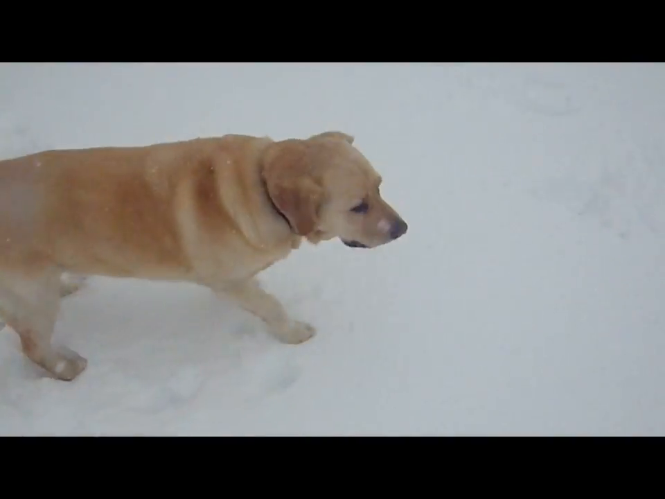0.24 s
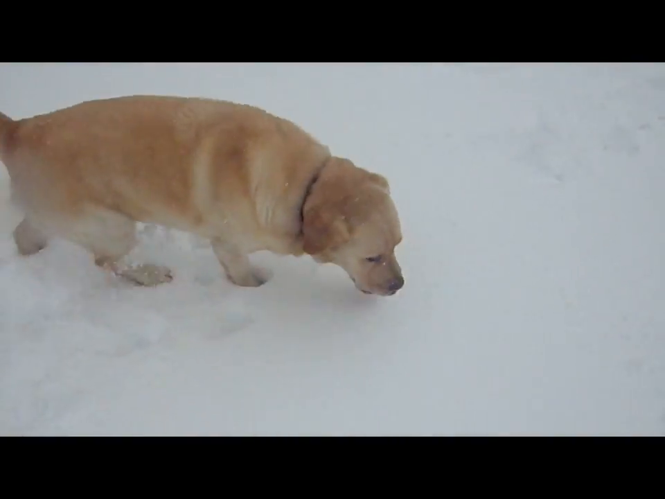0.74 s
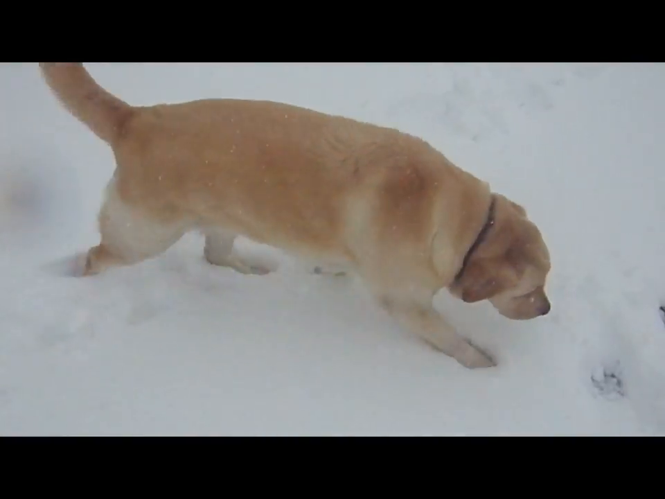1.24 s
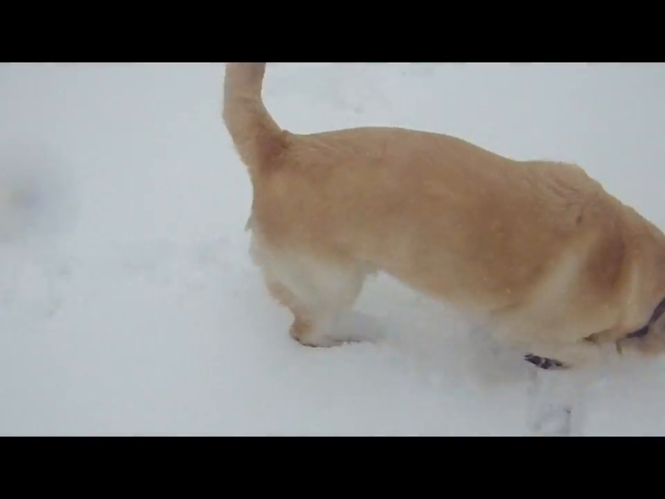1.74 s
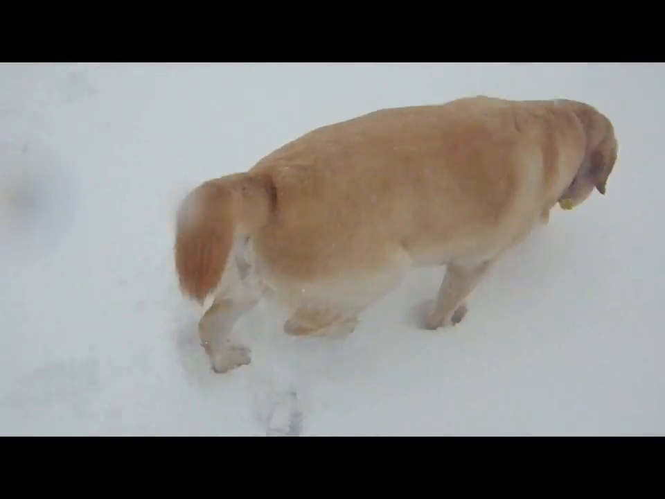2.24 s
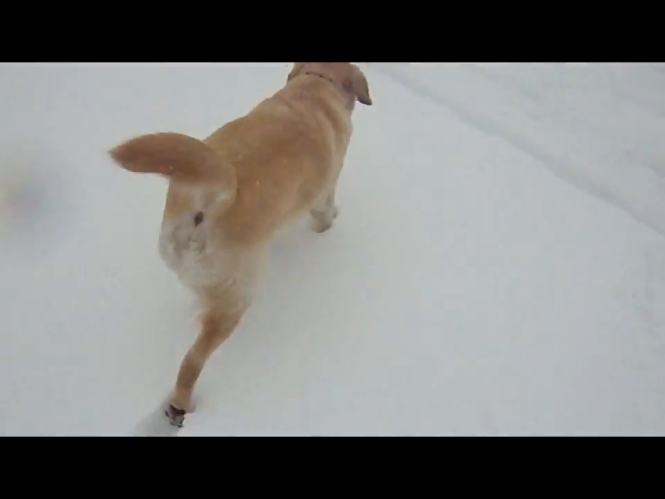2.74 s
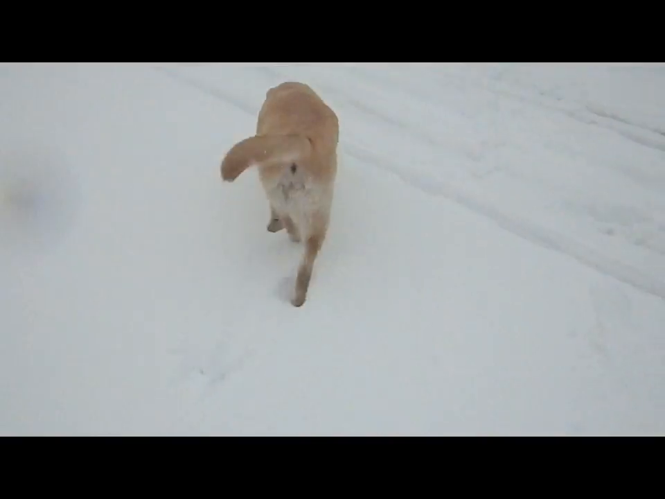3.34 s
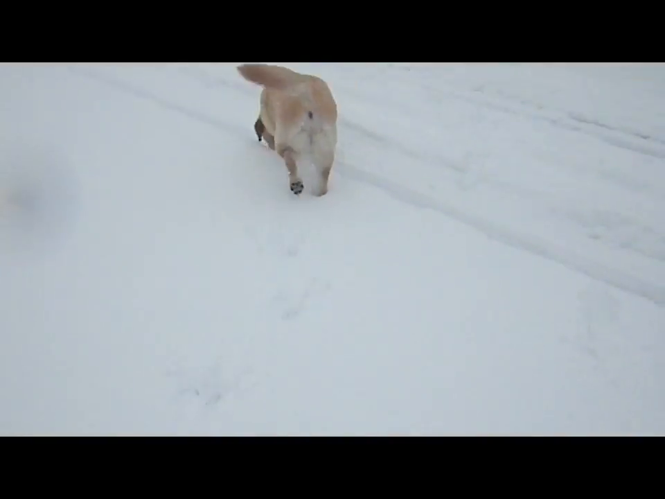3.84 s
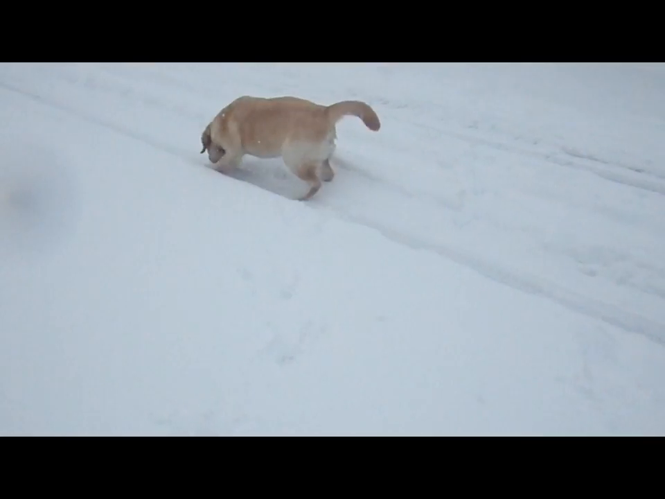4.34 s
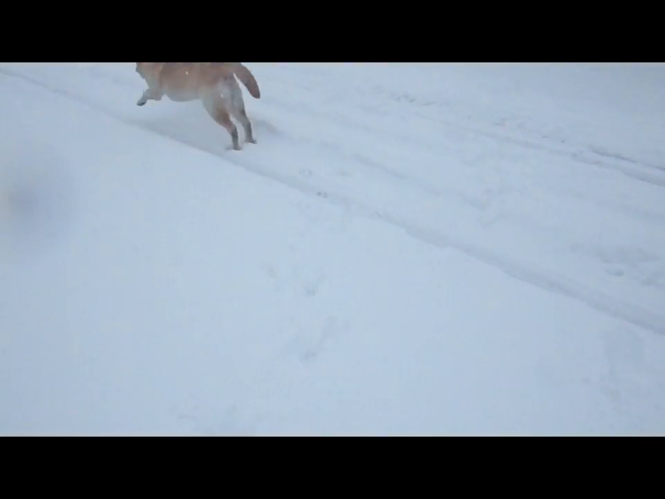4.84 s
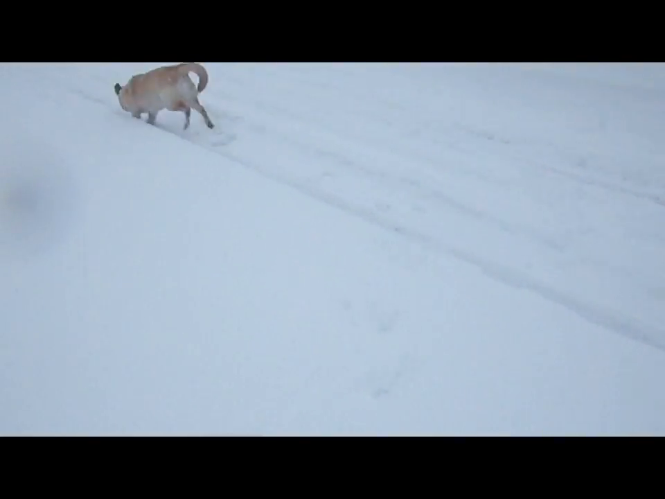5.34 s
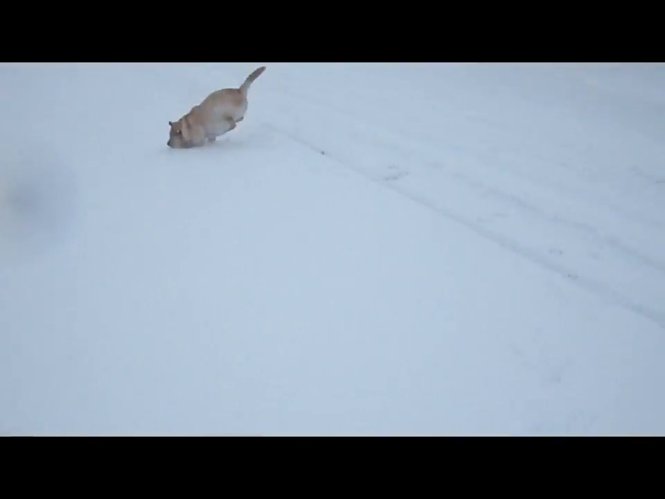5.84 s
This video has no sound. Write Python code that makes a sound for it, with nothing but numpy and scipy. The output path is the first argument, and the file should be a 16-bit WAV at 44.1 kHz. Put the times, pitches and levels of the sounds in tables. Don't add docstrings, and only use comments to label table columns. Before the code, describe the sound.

Outdoors, very close and dry, feet press into fresh snow beside a small hand-held microphone. From 0.2 s brittle cracks and a grainy crunch begin, while wind rushes in lumpy gusts, strongest near 0.5 and 1.1 s. Low bumps and fluttering thumps buffet the microphone from 0.7 to 1.5 s, loudest around 1.4, with a low scuff at 1.25. The crunch continues to 1.7 s; another press follows at 1.9, with softer air bumps until 2.4. Then wind drops to faint rumble and the snow is clear: a short bright crush at 2.8, a longer one from 3.2 to 3.5, and very loud sharp snaps near 3.7 and 4.0. Irregular crunches and cracks follow from 4.2 through 5.5, with a light scuff at 4.4 and a small bump at 5.05. Sparser crackling at 5.8 leads to a last crunch, low drag and soft wind bump just after 6 s.

```python
import sys
import numpy as np
from scipy import signal
from scipy.fft import rfft, irfft, next_fast_len
from scipy.io import wavfile
from scipy.ndimage import uniform_filter1d, map_coordinates

SR = 44100
rng = np.random.default_rng(int(sys.argv[2]) if len(sys.argv) > 2 else 0)


def generate_wav(signal):
    frames = np.transpose(np.atleast_2d(signal))
    scaled = np.clip(frames, -1, 1) * 32767
    pcm = np.round(scaled).astype(np.int16)
    wavfile.write(sys.argv[1], SR, pcm)


def boost(x):
    u = np.asarray(x, float) / 20
    return 10 ** u


N = 269010
SLOW_CLOCK = np.arange(0, N / SR + .004, .002)


def unit(x):
    return x / np.sqrt(np.mean(x ** 2) + 1e-20)


def wobble(rate):
    points = rng.standard_normal(int(N / 40) + 4)
    return map_coordinates(points, [np.arange(N) * rate / SR])


def filtered(x, response):
    size = next_fast_len(N + 8192)
    gain = response(np.fft.rfftfreq(size, 1 / SR))
    return irfft(rfft(x, size) * gain, size)[..., :N]


def coloured(x, points):
    f, db = np.transpose(points)
    return unit(filtered(x, lambda hz: boost(np.interp(np.log(hz + 1), np.log(f), db))))


def grains(chance, spread_db, life_s, cap_db=8):
    draw = rng.random((2, N))
    size_db = np.minimum(-spread_db * np.log(1 - draw[1]), cap_db)
    starts = (draw[0] < chance) * boost(size_db)
    return unit(signal.lfilter([1], [1, -np.exp(-1 / (life_s * SR))], starts))


def ring(t, hz, t60, attack_s):
    return np.sin(2 * np.pi * hz * t) * boost(-60 * t / t60) * (1 - np.exp(-t / attack_s))


def swells(shapes, floor_db):
    power = 0
    for level_db, over_db in shapes:
        power = power + boost(level_db) ** 2 * np.array([[1], [boost(over_db) ** 2]])
    time = np.arange(N) / SR
    return [np.interp(time, SLOW_CLOCK, np.sqrt(p + boost(db) ** 2)) for p, db in zip(power, floor_db)]


def air():
    # peak in seconds, rush level in dB, seconds to fall 10 dB, rumble in dB over the rush.
    gusts = [(.02, -36, .04, -2), (.12, -36, 0.07, -2), (.34, -26, 0.0947, -18), (.45, -22, .1, -22),
             (.54, -14, .07, -26), (.615, -17.5, .04, -24), (.705, -28, 0.05, -4), (.815, -25, .03, -5),
             (.89, -22, .06, -22), (.97, -20, .08, -22), (1.085, -13, .05, -30), (1.15, -17, .05, -20),
             (1.21, -21, .05, -10), (1.345, -33, .04, -1), (1.42, -27, .07, -2), (1.59, -35, 0.1426, -2),
             (1.92, -36, 0.1698, -4), (2.08, -35, 0.0829, -10.5), (2.24, -35, 0.0869, -2),
             (2.4, -37.5, 0.1513, -7.5), (2.5, -36.5, 0.06, -10), (2.78, -41, .07, -5),
             (3.1, -50, 0.0083, -1), (3.39, -37, .17, 1.5), (3.5, -41, .1, -6), (3.85, -40.5, 0.1913, 6.5),
             (4.15, -56.5, 0.0743, 7), (4.47, -36, 0.001, -18), (4.73, -48, .06, 4),
             (5.07, -49, 0.2503, 4.5), (5.25, -48.5, 0.1349, 2), (5.55, -45.5, 0.2697, 4),
             (5.99, -43, .04, -4), (6.055, -39, .035, -0.0167), (6.09, -44, .04, 9)]
    # frequency in Hz, level in dB per Hz.
    rush_tone = [(35, -47.5), (60, -12.5), (130, -5), (226, -.3), (304, -2), (764, -10.5), (826, -12),
                 (1010, -18), (1830, -31), (2500, -41.5), (3250, -67.5), (5500, -120)]
    # frequency in Hz, level in dB per Hz.
    rumble_tone = [(8.8, -35), (15, 3.5), (64, 5.5), (225, -6), (285, -54), (300, -25.5), (390, -42.5),
                   (660, -120)]
    rise_over_fall = 1.0556
    shapes = []
    for s, db, fall_s, over_db in gusts:
        away = np.maximum((s - SLOW_CLOCK) / rise_over_fall, SLOW_CLOCK - s)
        shapes.append((db - 10 * away / fall_s, over_db))
    high, low = swells(shapes, floor_db=(-56, -51))

    eddies = wobble(25)
    lumps = boost(.9 * eddies + 1.8 * wobble(110))
    spits = 2.0126 + 0.45 * grains(120 / SR, spread_db=6, life_s=0.002217)
    rush = coloured(lumps * spits * rng.standard_normal(N), rush_tone)
    rumble = coloured(boost(2.805 * eddies) * rng.standard_normal(N), rumble_tone)
    return boost(1.2) * high * rush + boost(1.56) * low * rumble


def bumps():
    # peak in seconds, level in dB, pitch in Hz, grit in dB under the peak.
    bump_rows = [(0.1212, -21, 237, -26.5), (0.7034, -10.5, 328.6, -15.5), (0.7793, -11, 318.8, -10),
                 (0.8103, -8.5, 290.9, -6), (0.8143, -6.5, 496, -16), (1.082, -15.5, 424, -9.5),
                 (1.1066, -4.5, 390.5, -22), (1.3252, -12, 487.7, -12), (1.3607, -10.5, 338, -8.5),
                 (1.401, -10.5, 211.3, -21.5), (1.4083, -1, 307.1, -23.5), (1.5448, -23.5, 163.8, -11.5),
                 (1.598, -22, 200, -14), (1.7009, -26, 94.24, -17), (1.9195, -16, 180.2, -12.5),
                 (1.9982, -18, 197.5, -19), (2.069, -22.5, 439.8, -3), (2.077, -20, 170, -20.5),
                 (2.096, -19, 181.4, -9), (2.2301, -12, 220.9, -5), (2.2315, -15, 463.1, -11),
                 (2.25, -22, 199.9, -13.5), (2.3621, -14, 507.3, -15.5), (2.7658, -24, 194.6, -10.5),
                 (4.695, -19, 190, -14), (5.0421, -15, 601.7, -4), (5.986, -26, 211.7, -7.5),
                 (6.0653, -13.5, 238.3, -17)]
    # peak in seconds, level in dB, pitch in Hz, grit in dB under the peak.
    flutter_rows = [
        (1.2505, -10, 280, -12),
        (1.2553, -13, 411.3, -4),
        (1.4132, -9, 560, -5),
        (1.4874, -20, 251.7, -13.5),
        (3.396, -20.5, 1147, -22),
        (4.4523, -19, 614.1, -7),
    ]
    # peak in seconds, level in dB, pitch in Hz.
    clod_rows = [(.3136, -22, 750), (.3431, -15, 840), (.3846, -21, 990), (.4593, -17, 720),
                 (.5457, -18, 890), (.6065, -18, 750), (.8796, -24, 740), (1.034, -16, 880),
                 (1.1687, -17, 850), (1.2315, -14, 330), (1.265, -13, 420), (1.2965, -17, 450),
                 (1.3709, -24, 690), (1.5651, -27, 740), (1.948, -28, 890), (2.1933, -27, 900),
                 (2.4099, -25, 860), (2.8082, -27, 1090), (2.8331, -28, 1240), (2.884, -29, 970),
                 (3.0698, -30, 960), (3.0956, -24, 940), (3.4493, -26, 1110), (3.5148, -27, 1030),
                 (3.6402, -26, 1100), (3.7524, -29, 800), (3.9005, -29, 900), (4.0019, -24, 1110),
                 (4.2327, -23, 1000), (4.2449, -29, 1190), (4.4093, -27, 1200), (4.4305, -25, 850),
                 (4.4689, -25, 1100), (4.482, -28, 700), (4.4985, -27, 600), (4.5346, -28, 720),
                 (4.7252, -31, 1030), (4.8655, -25, 1170), (5.3671, -30, 940), (5.7389, -27, 1220),
                 (5.9704, -27, 1150), (5.9784, -28, 340), (5.999, -28, 400), (6.0131, -29, 370),
                 (6.027, -29, 450), (6.057, -24, 450), (6.0902, -26, 310)]
    # frequency in Hz, level in dB per Hz.
    rasp_tone = [(150, -42.5), (400, 4.5), (800, 2.5), (1500, -3), (2200, -14.5), (3200, -25)]
    gritty_clods = [(*clod, -12) for clod in clod_rows]
    kinds = [(bump_rows, 0.79805), (flutter_rows, 2.2633), (gritty_clods, 1.5)]

    out, t = np.zeros(N + 4096), np.arange(-1024, 1024) / SR
    rasp = np.pad(coloured(rng.standard_normal(N), rasp_tone), (0, 4096))
    for rows, cycles in kinds:
        for s, db, hz, grit_db in rows:
            start = round(s * SR) - 1024
            phase = t * hz / cycles
            pull = np.exp(-1.6 * phase ** 2) * np.cos(2 * np.pi * hz * t)
            grit_bell = np.exp(-((phase - .3) / 1.1273) ** 2)
            grit = boost(grit_db - 1.4769) * grit_bell * rasp[start:][:len(t)]
            out[start:][:len(t)] += boost(db) * (grit - pull)
    return out[:N]


def scuffs():
    # start in seconds, level in dB, length in seconds, centre in Hz.
    drags = [
        (.32, -33, .05, 800),
        (1.25, -24, .048, 450),
        (3.08, -40, .05, 900),
        (3.42, -40, .05, 600),
        (4.415, -36, .07, 800),
        (4.52, -41, .08, 700),
        (5.965, -41, .08, 450),
    ]
    edge_db_s, width_octaves = 900, .65
    out, t = np.zeros(N + 16384), np.arange(16384) / SR - .05
    hz = np.fft.rfftfreq(len(t), 1 / SR)
    for s, db, length, centre_hz in drags:
        noise = rng.standard_normal(len(t))
        unevenness = np.repeat(rng.standard_normal(len(t) // 128), 128)
        rasp = noise * boost(4 * unevenness)
        octaves = np.log2((hz + 1) / centre_hz)
        band = irfft(rfft(rasp) * np.exp(-(octaves / width_octaves) ** 2 / 2))
        outside = np.maximum(np.maximum(-t, t - length), 0)
        out[round((s + t[0]) * SR):][:len(t)] += boost(db - edge_db_s * outside) * unit(band)
    return out[:N]


def crunch():
    # start in seconds, length in seconds, crystals in dB, packing snow in dB over them.
    presses = [(0.0, 0.02194, -41, 2), (0.266, 0.1771, -35, -1), (0.548, 0.06707, -33.5, -2),
               (0.725, 0.13156, -36.5, -11), (.86, .04, -38, 0.3), (.95, .05, -38, 5),
               (1.042, 0.1064, -34, 3.5), (1.238, .02, -36, 5), (1.29, .05, -33, -6), (1.42, .29, -32, -1),
               (1.88, 0.23597, -35, -1.5), (2.21, 0.04217, -34.5, -1), (2.339, .22, -32.5, -2),
               (2.62, .08, -37, -.3), (2.806, 0.07474, -30, -2), (2.999, 0.05325, -38.5, -0.1112),
               (3.089, .03, -33, .3), (3.182, 0.3044, -33.5, -2.5), (3.636, 0.1119, -33, -1.5),
               (3.778, 0.04126, -33.5, -4.5), (3.859, 0.09117, -40, 1.0737), (4.082, 0.02852, -36.5, -3.5),
               (4.226, 0.1863, -33, -5), (4.43, .04, -39.5, 6), (4.612, 0.04546, -33, -4.5),
               (4.741, 0.14056, -35.5, -4.5), (4.955, 0.09104, -32.5, -4), (5.181, 0.33, -32.5, -4.5),
               (5.58, .1, -38.5, -3), (5.76, .15, -34, -4.5), (5.98, 0.0377, -36.5, -2),
               (6.068, .04, -32, -5.5)]
    # frequency in Hz, level in dB per Hz.
    crystal_tone = [(1060, -28.5), (1800, -8), (2330, -3.5), (2580, -4), (3050, -3.5), (4110, -3),
                    (4510, -3.5), (6230, -0.5), (7720, 1), (9290, -3), (13200, -12.5), (15200, -21),
                    (16000, -25), (16500, -45)]
    # frequency in Hz, level in dB per Hz.
    packing_tone = [(200, -43.5), (400, 0), (700, 1.5), (1100, 0.5), (1450, 1.5), (1780, 3.5), (2050, -6.5),
                    (2600, -23), (4000, -33)]
    press_db_s, lift_db_s = 132, 102
    shapes = []
    for s, length, db, over_db in presses:
        before = np.maximum(s - SLOW_CLOCK, 0)
        after = np.maximum(SLOW_CLOCK - s - length, 0)
        shapes.append((db - press_db_s * before - lift_db_s * after, over_db))
    crystals, packing = swells(shapes, floor_db=(-44.5, -46))

    clumps = boost(2.7 * wobble(30))
    big = grains(260 * clumps / SR, spread_db=3.5, life_s=0.0006331)
    small = grains(200 * clumps / SR, spread_db=4.5, life_s=0.0004328)
    hiss = rng.standard_normal((2, N + 1))
    dull = unit(hiss[0, 1:] + 0.3932 * hiss[0, :-1])
    bright = unit(hiss[1, 1:] - 0.8214 * hiss[1, :-1])
    big_breaks = (1.05 + big + 0.1958 * small) * dull
    small_breaks = 0.7102 * (1.05 + small + 0.1741 * big) * bright
    fine = coloured(big_breaks + small_breaks, crystal_tone)

    lumps = grains(150 / SR, spread_db=7, life_s=0.004456)
    grind = 1.028 + 0.8793 * big + 0.8205 * lumps
    coarse = coloured(grind * rng.standard_normal(N), packing_tone)
    return boost(.5) * clumps ** .4 * crystals * fine + boost(-3.5) * packing * coarse


def cracks():
    # start in seconds, snap peak in dB, shell ring in dB against it,
    # mid ring in dB against it, snap pitch in Hz.
    crack_rows = [(0.2419, -1, -31.5, -10.5, 7310), (0.4253, -2.5, -22, -12, 8974),
                  (1.0463, -1.5, -35, -.7, 9490), (1.8663, -6, -35.5, -16.5, 5727),
                  (2.2157, -1, -23, -9.5, 10100), (2.234, -3.5, -33, -16.5, 10120),
                  (3.1375, -4.5, -33.5, -6, 8408), (3.3329, -1, -45, -29, 8791),
                  (3.3779, 1.5, -19.5, -30.5, 8261), (3.6394, -2, -26.5, -29, 8512),
                  (3.6857, 6, -8, 3.5, 9965), (3.6986, -5, -30, -14.5, 7210), (3.777, -1.5, -11, -12, 7405),
                  (3.8669, -6, -20, -7, 8531), (4.0012, 8, -30, -27, 10240), (4.0227, -5.5, -27, -9.5, 8982),
                  (4.1989, -3.5, -42, -7, 9290), (4.233, -2, -26, -18, 8865), (4.6265, 1, -42, -41, 9685),
                  (4.6592, 1, -23.5, -14, 13130), (4.8634, 0, -17, -7.5, 9981),
                  (4.9353, -4.5, -28, -4.5, 8677), (5.1793, -2.5, -16, -17, 10310),
                  (5.2188, -3, -6, -11, 7082),
                  (0.1951, -5, -29, -10, 8830.0), (0.2028, -9, -24, -16, 12400.0),
                     (0.2949, -13, -14, -9, 6870.0), (0.3108, -14, -50, -1, 10560.0),
                     (0.3383, -11, -55, -13, 9070.0), (0.3839, -9, -21, -51, 7020.0),
                     (0.4552, -7, -16, -27, 8380.0), (0.5446, -7, -16, -8, 9020.0),
                     (0.6346, -12, -19, -7, 6100.0), (0.77, -13, -33, -13, 7350.0),
                     (1.255, -17, -6, -6, 9690.0), (1.5008, -9, -50, -34, 10030.0),
                     (1.5405, -9, -54, -6, 7270.0), (2.3942, -9, -18, -18, 6490.0),
                     (2.8697, -11, -36, 2, 8240.0), (2.9664, -11, -19, -7, 9690.0),
                     (3.0923, -11, -27, -13, 7150.0), (3.1024, -11, -50, -4, 8510.0),
                     (3.4305, -8, -11, -11, 9380.0), (3.5662, -13, -24, -5, 6960.0),
                     (3.9189, -9, -31, -8, 7140.0), (3.9884, -8, -22, -10, 9080.0),
                     (4.1651, -15, -35, 0, 8370.0), (4.217, -8, -17, -17, 11730.0),
                     (4.5741, -12, -27, -10, 9550.0), (4.8474, -10, -9, -6, 8110.0),
                     (4.9454, -10, -20, 0, 8350.0), (5.0159, -8, -20, -14, 9010.0),
                     (5.0414, -13, -1, 1, 7410.0), (5.1098, -6, -15, -7, 10910.0),
                     (5.2403, -17, -24, 4, 7280.0), (5.3066, -9, -22, -6, 8510.0),
                     (5.522, -9, -35, -2, 9560.0), (5.5934, -11, -30, -9, 9020.0),
                     (5.7733, -6, -8, -10, 7070.0), (5.7991, -6, -18, -13, 9050.0),
                     (5.8434, -9, -20, -8, 12020.0), (5.8528, -10, -29, 0, 9930.0),
                     (6.0025, -11, -18, -4, 7260.0), (6.0938, -9, -33, 2, 11470.0)]
    # start in seconds, peak in dB, pitch in Hz.
    snap_rows = [(0.2571, -12, 5760.0), (0.4085, -11, 8740.0), (0.5323, -15, 6670.0), (0.5804, -14, 6250.0),
                 (0.5948, -13, 8780.0), (0.6291, -17, 7950.0), (0.6396, -14, 7550.0), (0.669, -11, 9530.0),
                 (0.6836, -22, 8260.0), (0.7045, -16, 7210.0), (0.8259, -13, 7580.0), (0.9403, -18, 6830.0),
                 (1.235, -15, 8590.0), (1.3125, -15, 8980.0), (1.5522, -13, 8840.0), (1.5903, -13, 8590.0),
                 (1.6157, -14, 6870.0), (1.7169, -12, 9660.0), (1.7584, -15, 8400.0), (1.9956, -18, 9030.0),
                 (2.0476, -15, 9770.0), (2.0557, -15, 6840.0), (2.0772, -13, 7340.0), (2.3283, -17, 8420.0),
                 (2.3589, -13, 7540.0), (2.3766, -13, 6970.0), (2.4714, -15, 6170.0), (2.7088, -19, 7030.0),
                 (2.9193, -14, 7820.0), (3.0445, -12, 6970.0), (3.1922, -9, 6610.0), (3.2139, -18, 6550.0),
                 (3.2533, -12, 7350.0), (3.6105, -15, 7120.0), (3.9304, -15, 7330.0), (4.5196, -19, 8370.0),
                 (4.6502, -14, 6890.0), (4.6806, -10, 7770.0), (4.7816, -14, 6950.0),
                 (4.9039, -17, 10750.0), (5.3246, -12, 6320.0), (5.3865, -12, 6910.0),
                 (5.4847, -16, 6770.0), (5.8694, -12, 10340.0), (6.0558, -15, 9070.0)]
    # start in seconds, peak in dB, snap pitch in Hz, ring pitch in Hz.
    tick_rows = [(0.0098, -21, 7870.0, 4390), (0.1335, -23, 7300.0, 4880), (0.3663, -21, 8420.0, 3940),
                 (0.3888, -20, 8950.0, 3530), (0.4766, -17, 9300.0, 3850), (0.9904, -17, 7120.0, 4200),
                 (1.0513, -17, 11680.0, 3830), (1.3907, -16, 7080.0, 4510), (1.8373, -21, 7200.0, 3240),
                 (1.8707, -20, 8950.0, 4510), (2.0894, -18, 6400.0, 3200), (2.5059, -19, 6730.0, 4470),
                 (2.6199, -19, 8530.0, 4350), (2.6725, -21, 9210.0, 3490), (2.7396, -17, 7360.0, 3260),
                 (2.8129, -18, 6980.0, 4570), (2.8843, -20, 7550.0, 4390), (3.1267, -18, 6250.0, 4150),
                 (3.2086, -16, 8250.0, 3810), (3.2847, -21, 7440.0, 4150), (3.3882, -17, 6790.0, 4190),
                 (3.4618, -18, 6370.0, 4040), (3.5523, -20, 7380.0, 4560), (3.5842, -20, 7290.0, 4390),
                 (3.6284, -18, 8830.0, 2900), (3.6551, -18, 7550.0, 3720), (3.8168, -14, 5630.0, 5100),
                 (4.4092, -16, 9480.0, 3940), (4.7897, -19, 7910.0, 4640), (5.03, -19, 7390.0, 4190),
                 (5.0557, -23, 7080.0, 4040), (5.1197, -19, 8910.0, 4050), (5.1426, -19, 7540.0, 3740),
                 (5.2019, -17, 7000.0, 3740), (5.2071, -21, 6190.0, 4560), (5.2541, -19, 6740.0, 4610),
                 (5.3355, -19, 8520.0, 3670), (5.4642, -14, 9940.0, 3770), (5.5357, -18, 8730.0, 4150),
                 (5.5719, -16, 9840.0, 3900), (5.6552, -19, 6650.0, 4500), (5.6873, -20, 9170.0, 3910),
                 (5.7506, -18, 7720.0, 4240), (5.7574, -16, 10260.0, 3610), (5.9601, -17, 8520.0, 3990)]
    # start in seconds, peak in dB, pitch in Hz.
    knock_rows = [(0.6111, -15, 6670.0), (0.8106, -23, 7620.0), (0.9612, -20, 7330.0),
                  (1.2804, -16, 7010.0), (1.3592, -15, 6880.0), (1.5586, -14, 11140.0), (1.65, -18, 6620.0),
                  (1.696, -17, 7240.0), (1.9001, -16, 6300.0), (2.5233, -19, 6130.0), (2.626, -16, 6580.0),
                  (2.6867, -23, 9160.0), (3.4361, -14, 9340.0), (3.6927, -13, 9180.0),
                  (3.8236, -14, 10420.0), (4.3937, -15, 9100.0), (4.4183, -16, 11310.0),
                  (4.7416, -19, 7770.0), (5.3001, -15, 8630.0)]
    # pitch in Hz, level in dB, time to fall 60 dB in seconds.
    shell_tones = [(1244.7, -6.5, 0.01641), (1807.4, 3, 0.013657)]
    # rows, (shell ring, mid ring) in dB against the snap
    kinds = [(snap_rows, (-22, -12.5)), (tick_rows, (-20, -3.5)), (knock_rows, (-10.5, -5.5))]
    rows = crack_rows
    for table, rings in kinds:
        rows = rows + [(s, db, *rings, *pitch) for s, db, *pitch in table]

    out, t = np.zeros(N + 2048), np.arange(1024) / SR
    chance = rng.standard_normal((len(rows), 1030))
    for (s, db, low_db, mid_db, hz, *ring_hz), r in zip(rows, chance):
        spit = (r[6:] - 1.2 * r[4:-2] + 1.0788 * r[2:-4]) * boost(-60 * t / 0.005246)
        snap = 1.75 * ring(t, hz, 0.0018795, attack_s=.0001) + .22 * spit
        mid_hz = ring_hz[0] if ring_hz else 4020 * (1 + .025 * r[0])
        mid = boost(mid_db + 4.5) * ring(t, mid_hz, 0.0031, attack_s=.00007)
        low = 0
        for (f, level, t60), scatter_db in zip(shell_tones, 1.2 * r[1:3]):
            low = low + boost(low_db + 1.5 + level + scatter_db) * ring(t, f, t60, attack_s=0.0003822)
        out[round(s * SR):][:len(t)] += boost(db) * (snap + mid + low)
    return out[:N]


def scene():
    return (air() + bumps() + scuffs() + crunch() + cracks())[None]


def roll_off(x):
    return signal.sosfilt(signal.butter(12, 17160, fs=SR, output="sos"), x)


def record(dry):
    # centre in Hz, width in Hz, depth from 0 to 1.
    dips = [(7884.9, 220.04, 0.79), (12103, 612.2, 0.5)]
    # frequency in Hz, level in dB.
    treble_limit = [(15800, 0), (16000, -32), (16600, -36), (16850, -70)]

    def dip_gain(hz):
        return np.prod([1 - min(depth, .99) * np.exp(-((hz - c) / w) ** 2) for c, w, depth in dips], axis=0)

    x = filtered(dry, dip_gain)
    keep = np.exp(-1 / (.06 * SR))
    recent = signal.lfilter([0, 1 - keep], [1, -keep], x ** 4) ** (1 / 4)
    ducking = 1 + 1.0216 * uniform_filter1d(np.roll(recent, 220), size=220)
    x = x / ducking * boost(0.1451)
    x = x / (1 + np.abs(x) ** 8) ** (1 / 8)
    x = filtered(x, lambda hz: boost(np.interp(hz, *np.transpose(treble_limit))))
    return roll_off(x)


dry = scene()
out = record(dry)
generate_wav(out)
```